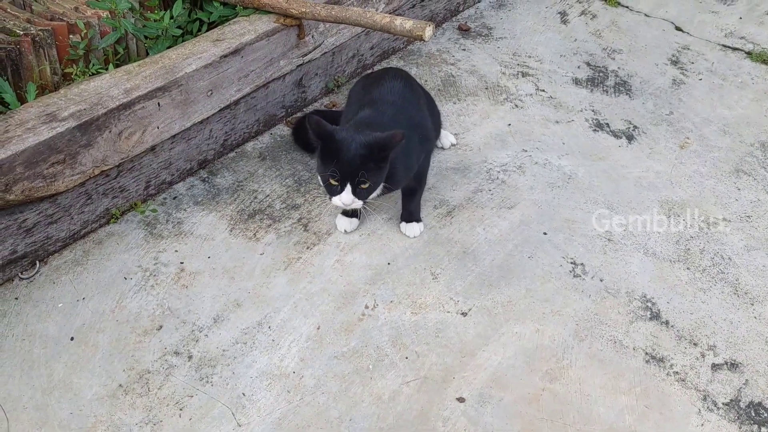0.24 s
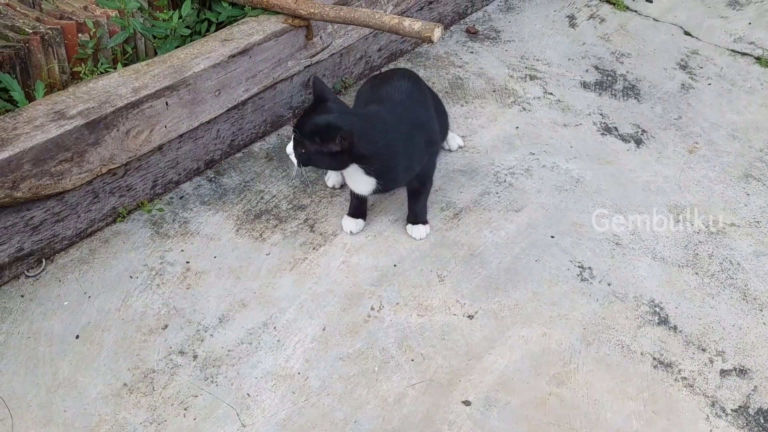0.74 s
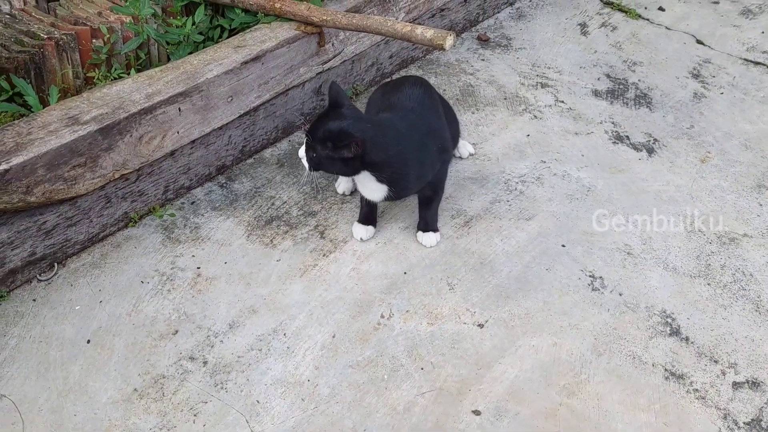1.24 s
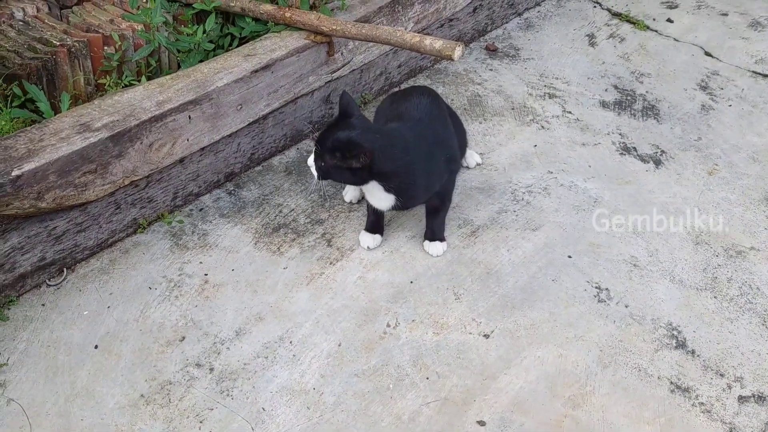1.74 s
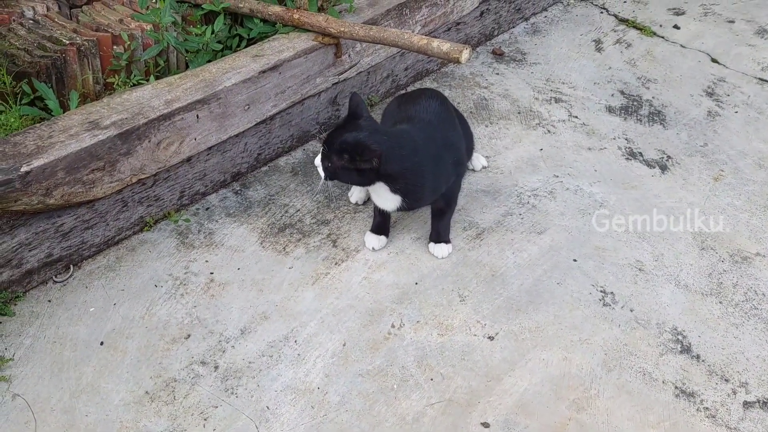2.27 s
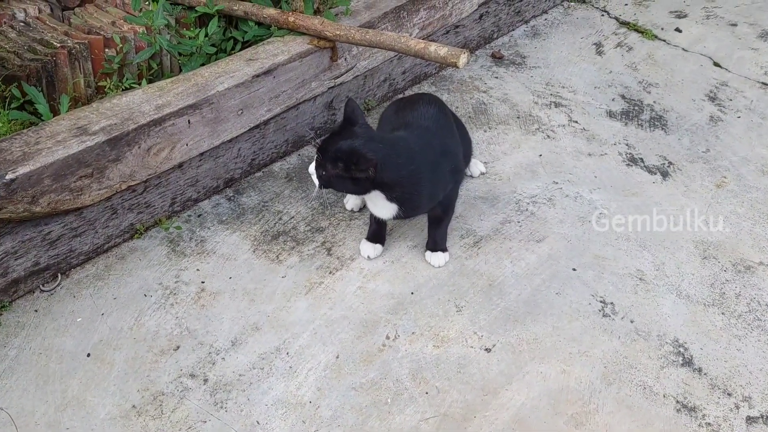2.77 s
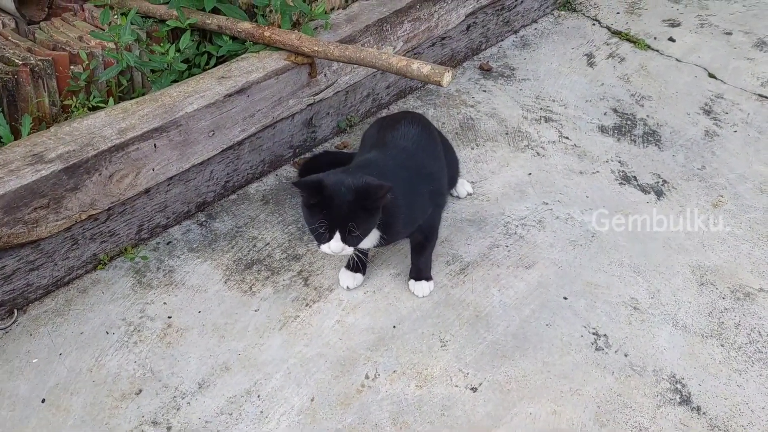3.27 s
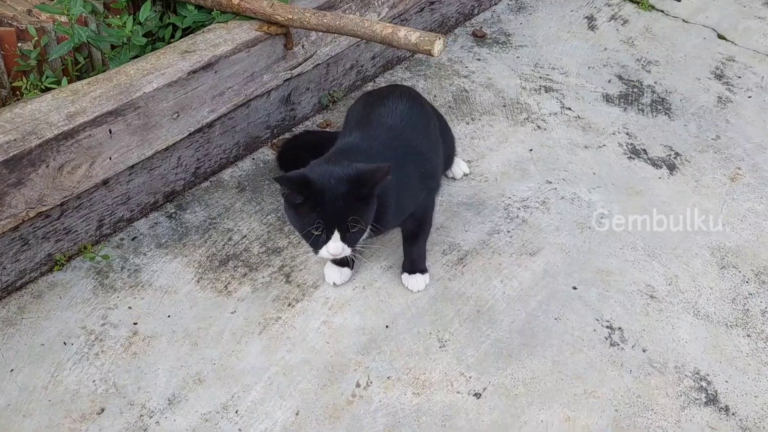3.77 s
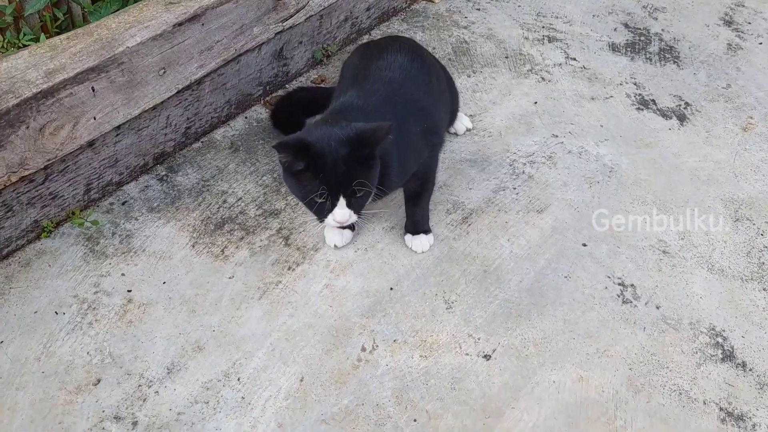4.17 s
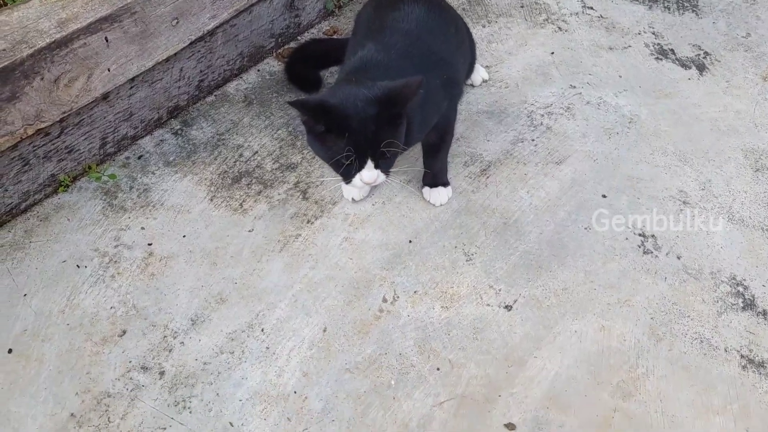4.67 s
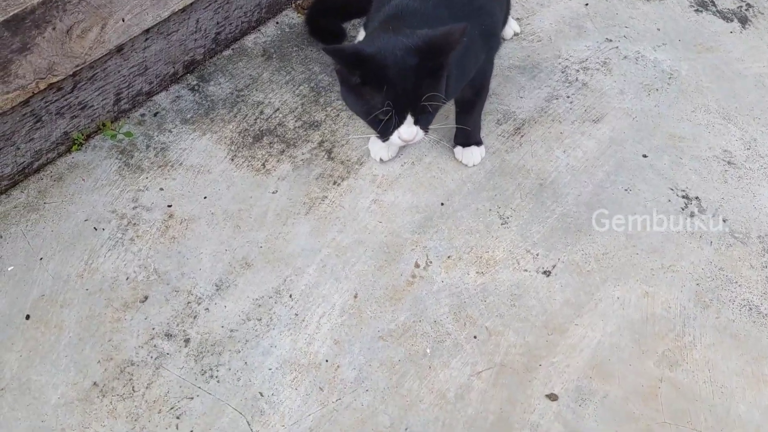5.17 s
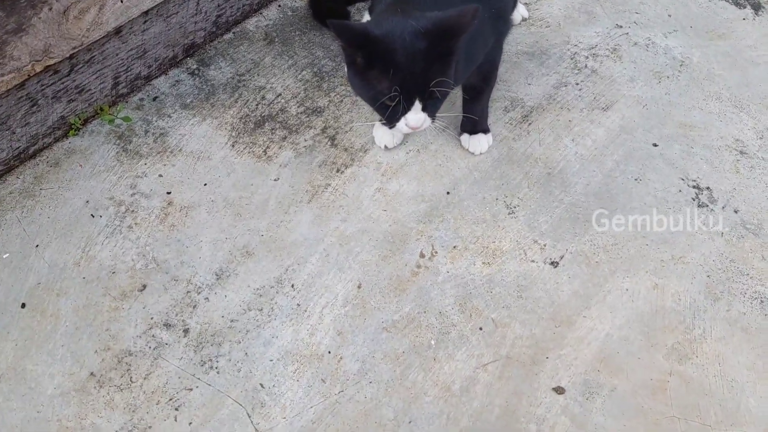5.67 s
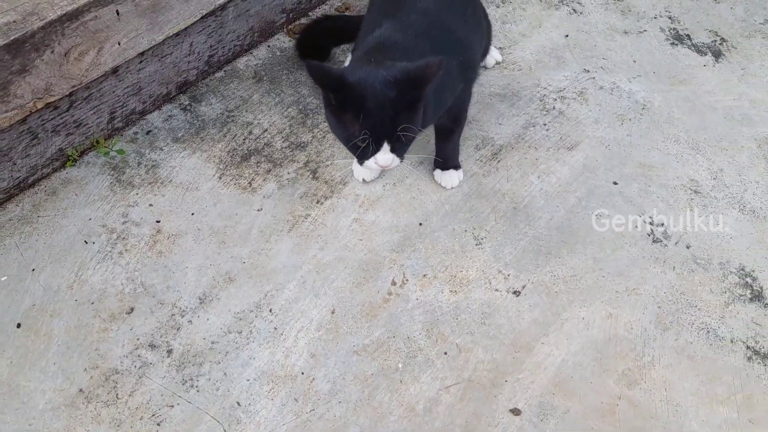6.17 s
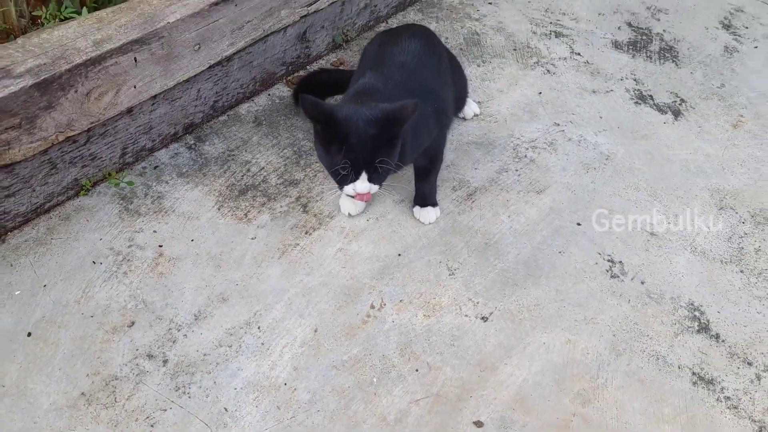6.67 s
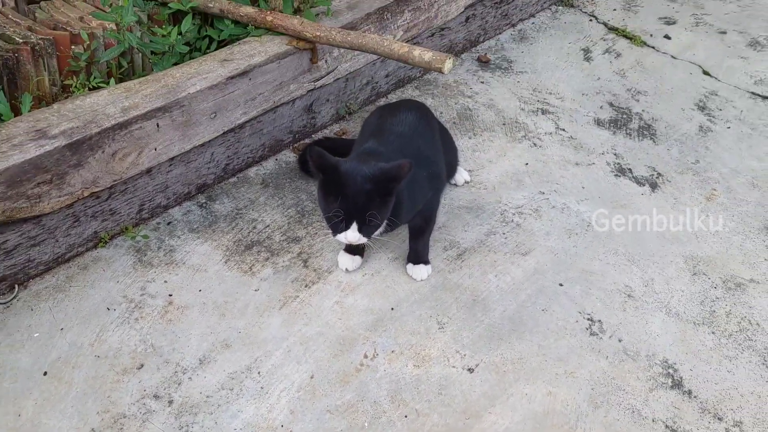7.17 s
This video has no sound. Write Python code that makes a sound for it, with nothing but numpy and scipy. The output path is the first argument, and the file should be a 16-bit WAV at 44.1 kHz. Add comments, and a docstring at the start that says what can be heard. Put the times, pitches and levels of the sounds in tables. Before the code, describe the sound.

Outdoors in a paved yard with faint traffic rumble and thin insect hiss, a cat gives a brief low growl. A songbird whistles a quick repeating phrase on the left. The growl returns, climbs and opens into one long, loud, nasal yowl that falls away. A rival's softer moan overlaps its end and sinks into a creaky growl, with a few bird notes. Close cat, light open-air echo.

```python
"""In a paved yard with insects and far traffic in the air, a songbird repeats its phrase from the trees. A tomcat
growls low, then opens its mouth into one long yowl; a rival answers with a falling moan and a creaky growl.
The cat is a stack of overtones shaped by nose, mouth and throat; the rival is uneven pulses ringing a throat.
Birds are near-sine whistles on drawn tracks; insects, hiss, breath and traffic are shaped noise.
Decaying noise echoes the animals off walls and trees."""
import sys
import numpy as np
from scipy import signal
from scipy.io import wavfile
from scipy.ndimage import uniform_filter1d

SR = 44100
rng = np.random.default_rng(int(sys.argv[2]) if len(sys.argv) > 2 else 0)


def master(y):
    """Save y as 16-bit WAV."""
    cut = np.clip(np.atleast_2d(y).T, -1, 1)
    pcm = np.round(cut * 32767)  # scale
    wavfile.write(sys.argv[1], SR, pcm.astype(np.int16))


N = 327663
T = np.arange(N) / SR
CONTROL_STEP = 64   # samples between the slow control points of the tomcat

# Colour of the open air and far traffic: (frequency [Hz], relative density [dB per Hz])
AIR_COLOUR = [(15, -47), (25, -27), (43, -6.5), (91, -4.5), (125, -7.5), (147, -14), (227, -15.5),
              (410, -28), (701, -35), (2690, -44), (3250, -39), (5130, -63.5), (5870, -39.5),
              (10300, -42.5), (15400, -54)]
AIR_DB = -54
# Swell of the far traffic: (time [s], level change [dB])
TRAFFIC_SWELL = [(0, 4), (1, 0), (2, 3), (4, 6.5), (5, 4.5), (6.6, -4.5), (7.1, 0), (7.43, 2.5)]
# How alike left and right are in the noise beds: (frequency [Hz], likeness [0 to 1])
STEREO_LIKENESS = [(50, 0.94), (150, 0.78), (500, 0.37), (2000, 0.27), (8000, 0.0091)]
# Treble hiss: (time [s], level [dB])
HISS_LEVEL = [(0, -70), (.85, -78), (1.5, -75), (3, -73), (4, -64.5), (5.3, -64.5), (6.0, -69), (6.45, -90),
              (7.43, -82)]
# Colour of the treble hiss: (frequency [Hz], relative density [dB per Hz])
HISS_COLOUR = [(5000, -37), (7500, -12.5), (9500, -3), (12000, 3.5), (15500, 0.5)]
# Short swells of the hiss: (centre time [s], half length [s], added level [dB])
HISS_SWELLS = [(1.487, .04, 4), (2.077, 0.18, 8.5), (4.74, .04, 2), (6.58, 0.072, 8), (7.153, 0.16, 19)]
# Soft broad puffs: (centre time [s], half length [s], frequency [Hz], width [Hz], level [dB])
SOFT_PUFFS = [(3.23, 0.044, 3850, 3180, -61), (7.158, 0.2, 3910, 2530, -62)]
# Steady insect choruses: (frequency [Hz], width [Hz], level [dB])
INSECT_CHORUSES = [(6006, 270, -72.5), (10200, 1300, -74)]
# A cricket that comes and goes: (time [s], level [dB])
CRICKET_LEVEL = [(0, -72), (.78, -70), (.86, -123), (3, -88.5), (6.2, -79.5), (7.43, -78)]

# Shapes of the clear bird notes: (time from onset [s], pitch [Hz], level [dB])
ARCH_NOTE = [(-.006, 2830, -81), (-.003, 2900, -58), (.005, 3065, -46), (.037, 3200, -45),
             (.043, 3464, -41), (.047, 3500, -66), (.051, 3350, -42.5), (.071, 3226, -44.5),
             (.075, 2960, -49), (.077, 2783, -41), (.085, 2825, -57.5), (.091, 2810, -52),
             (.095, 2830, -73)]
CLIMB_NOTE = [(-.004, 1970, -54), (0, 2064, -67), (.008, 2160, -42.5), (.017, 2620, -39),
              (.023, 2738, -48.5), (.035, 2410, -42), (.038, 2260, -101), (.044, 2587, -33),
              (.05, 2434, -67), (.055, 2710, -46), (.062, 2977, -37.5), (.092, 3240, -37.5),
              (.104, 3160, -46), (.107, 3068, -75)]
WARBLE_NOTE = [(-.1, 2560, -69), (-.088, 2130, -54.5), (-.076, 2350, -55), (-.073, 2870, -47),
               (-.062, 2853, -52), (-.055, 2850, -80), (-.034, 3158, -80), (-.028, 3150, -48),
               (-.016, 3000, -45), (-.005, 2800, -62), (.002, 3744, -39), (.008, 4257, -56),
               (.016, 3906, -37), (.024, 3500, -40), (.032, 3600, -39.5), (.046, 3200, -35),
               (.06, 3400, -34), (.068, 3640, -38), (.074, 4083, -44.5), (.08, 3936, -37),
               (.086, 3500, -57), (.091, 3400, -38), (.098, 3450, -32.5), (.124, 3080, -33),
               (.138, 3330, -39), (.148, 3090, -38), (.166, 3100, -32), (.185, 2838, -38),
               (.188, 2774, -52)]
FALL_NOTE = [(0, 2754, -63), (.009, 2695, -38), (.027, 2480, -44), (.035, 2394, -64)]
# Shape of the harsh bird note: (time from onset [s], pitch [Hz], relative level [dB])
BURR_NOTE = [(0, 3080, 6.5), (.006, 3500, 2), (.014, 3844, 3), (.025, 3864, 8.5), (.04, 3900, -3),
             (.055, 3730, -43)]
# When each note is sung: (onset [s], added level [dB], pitch factor [ratio], time stretch [ratio])
ARCHES_SUNG = [(1.132, 3, 1.016, 0.93), (1.525, 6.5, 1.01, 1.08), (1.934, 4.5, 0.986, 1.1),
               (2.353, 4, 1.018, 1.04)]
CLIMBS_SUNG = [(1.286, 0.22, .99, 0.92), (1.687, 0.53, 1, 0.92), (2.102, 0.91, .99, 0.89),
               (2.523, -1.6, 1, 0.93)]
WARBLES_SUNG = [(0.361, -1, 1, 0.99), (6.86, -10.5, 1.08, 0.9)]
FALLS_SUNG = [(.551, 0.5, 1.001, 1.01), (7.043, -1, 1.01, .85)]
BURRS_SUNG = [(1.044, -62, 0.98, 1.08), (1.433, -51, 0.97, 0.95), (1.848, -52, 0.99, 1.06),
              (2.26, -51, 0.97, 0.94)]
# A faint far note: (time [s], pitch [Hz], level [dB])
FAR_PEEP = [(6.59, 3500, -79), (6.62, 3610, -75), (6.71, 3500, -69), (6.74, 3340, -75)]
# A second bird's hoarse note: (time [s], pitch [Hz], level [dB])
HOARSE_NOTE = [(6.82, 2635, -78.5), (6.96, 2746, -55.5), (7.21, 2790, -54), (7.27, 2743, -81),
               (7.4, 2750, -91)]
# The bird sits to the left: samples late on the right, until the yowl ends and after it
BIRD_LAG_EARLY, BIRD_LAG_LATE = 19, 8

# The rival's moan breaking into a creak: (time [s], pulse rate [per s], resonance [Hz], level [dB])
RIVAL_VOICE = [(5.62, 785, 782, -75.5), (5.66, 800, 745, -56.5), (5.75, 650, 710, -54.5),
               (5.85, 630, 651, -56.5), (5.9, 182, 700, -52.5), (6.4, 95, 724, -55.5),
               (6.9, 62.6, 745, -55.5), (7.43, 100, 721, -57)]
# The rival's low chest ring: (time [s], level [dB])
RIVAL_CHEST = [(5.75, -87), (5.85, -66), (6.2, -62), (6.5, -76.5), (6.9, -73), (7.1, -64), (7.43, -78.5)]

# Air rushing through the tomcat's mouth: (time [s], level [dB])
BREATH_LEVEL = [(1.9, -109.5), (2.2, -73.5), (3.2, -79), (3.4, -65.5), (3.65, -56), (3.8, -57.5),
                (5.9, -73), (6.1, -53.5), (6.3, -63), (6.34, -100)]
# Pitch of the vocal folds through growls and yowl: (time [s], pitch before jitter [Hz])
FOLD_PITCH = [(0, 117.6), (.13, 123.9), (.25, 120.3), (.48, 99.8), (1.78, 97.4), (2.04, 124.7),
              (2.4, 137.4), (2.76, 131.2), (2.88, 119.1), (3.12, 133.4), (3.24, 133.9), (3.4, 149.8),
              (3.5, 203), (3.6, 277.3), (3.68, 317.3), (3.76, 341.5), (3.88, 355.4), (4.13, 398.6),
              (4.28, 452.7), (4.38, 485.5), (4.44, 494.5), (4.52, 474.8), (4.72, 453.5), (4.86, 450.6),
              (5.03, 472), (5.16, 477.3), (5.42, 475.1), (5.6, 465.7), (5.82, 467.2), (5.98, 456.8),
              (6.05, 439.1), (6.18, 362.7), (6.335, 286)]
# The voice catches: (time [s], pitch dip [%])
VOICE_CATCHES = [(4.132, 1.43), (4.521, .7), (4.681, 1.3), (4.719, 3.7)]
# Closed-mouth growls: (start [s], end [s], nose level [dB], half-line level [dB])
GROWL_SPANS = [(-.05, 0.478, -47.5, -16), (1.782, 3.504, -46, -8)]
# Nose levels hold at GROWL_HZ; a higher growl is louder
GROWL_HZ, GROWL_DB_PER_HZ, GROWL_FADE_S = 134.9, .5, 0.077
HALVES_STOP_S, HALVES_FLUTTER_DB = 0.12, 2.5   # half lines end before the growl; they come and go
YOWL_START_S, YOWL_END_S, YOWL_FADE_S = 3.33, 6.335, 0.025
YOWL_SWELL_S, YOWL_NOSE_DB = .12, -32   # the yowl grows out of the growl
# Resonance of the nose: (frequency [Hz], gain [dB])
NOSE_GAIN = [(60, -0.5), (130, 20), (190, 0.5), (270, 6), (340, -2), (470, -19), (540, -36), (700, -52)]
# The mouth in the yowl: (time [s], mouth ring [Hz], mouth level [dB], throat level [dB], open level [dB])
MOUTH_TRACK = [(3.44, 1145, -101, -102, -63.5), (3.52, 879, -82, -86, -63), (3.601, 893, -44, -64, -52.5),
               (3.68, 983, -44.5, -48.5, -54.5), (3.861, 1141, -29.5, -57, -49),
               (3.981, 1152, -31, -53, -45), (4.141, 1244, -21, -44.5, -64), (4.165, 1316, -17.5, -68, -43),
               (4.24, 1356, -20, -71, -44.5), (4.28, 1364, -18, -42.5, -44.5),
               (4.339, 1528, -18.5, -35.5, -50), (4.438, 1763, -11, -39.5, -55.5),
               (4.518, 1691, -10, -26, -53), (4.72, 1646, -10.5, -26.5, -48), (4.858, 1667, -7.5, -30, -51),
               (5.161, 1671, -6.5, -25, -56), (5.401, 1424, -12.5, -33.5, -54),
               (5.6, 1412, -18.5, -32.5, -52.5), (5.82, 1491, -12, -33.5, -53.5),
               (5.92, 1378, -16.5, -39.5, -48.5), (5.979, 1450, -23.5, -42.5, -39.5),
               (6.058, 1394, -23.5, -46.5, -37.5), (6.08, 1358, -25.5, -61, -38.5),
               (6.18, 1150, -47, -54, -45.5), (6.33, 955, -79, -82, -53.5)]
MOUTH_WIDTH_HZ, THROAT_WIDTH_HZ = 164, 266
# Throat ring with the mouth at 1400 Hz; it follows the mouth by this share
THROAT_HZ, THROAT_PER_MOUTH_HZ = 2620, 0.51
# Broad colour of the open mouth below the throat ring: (frequency [Hz], gain [dB])
OPEN_LOW_GAIN = [(400, -21.5), (650, 1.5), (950, -2), (1400, -14), (2300, -34.5), (3200, -27.5)]
# Colour of the upper overtones: (frequency with the mouth wide [Hz], gain [dB])
OPEN_HIGH_GAIN = [(3000, -7), (3400, -14.5), (3700, -35.5), (3950, -34), (4300, -1.5), (5000, -2.5),
                  (5800, 9.5), (6500, -1), (7400, -51), (10000, -42.5), (11000, -25), (12500, -12),
                  (13500, -31), (15000, -19.5), (16000, -39)]
# Upper overtones against the throat ring; each swells and sinks on its own
UPPER_DB, UPPER_WANDER_DB = -32.5, 2.2
# A small mouth cavity that rings on its own: (time [s], frequency [Hz], level [dB])
CAVITY_RING = [(3.6, 3730, -120), (3.95, 4400, -66.5), (4.13, 4410, -74), (4.15, 4460, -55),
               (4.24, 4500, -59), (4.45, 4393, -58), (5, 4300, -58.5), (5.9, 5090, -62.5),
               (6.08, 4208, -55), (6.17, 3970, -59.5), (6.3, 3510, -68)]
# Overtones glint high up: (start [s], end [s], from [Hz], to [Hz], width [Hz], level [dB])
HIGH_GLINTS = [(4.33, 4.48, 11600, 11900, 600, -62), (4.8, 5.42, 12000, 12000, 3000, -68),
               (5.5, 6.1, 15100, 14300, 800, -65)]
# The yowl shifts between left and right: (time [s], left over right [dB])
YOWL_SIDE = [(3.4, 4), (3.8, -1), (4.25, -3.5), (4.45, -10), (4.7, 3), (5.0, -0.5), (5.15, -4.5),
             (5.95, 0.5), (6.1, 7.5), (6.35, 1)]


def from_db(db):
    """dB to gain."""
    return 10 ** (np.asarray(db) / 20)


def rms_one(x):
    """Scale to rms 1."""
    return x / np.sqrt(np.mean(x ** 2) + 1e-20)


def in_time(rows, t=T):
    """Columns of a table joined by straight lines in time."""
    s, *columns = np.transpose(rows)
    return [np.interp(t, s, c) for c in columns]


def at_hz(points, hz):
    """A spectrum read on a log frequency axis."""
    table_hz, values = np.transpose(points)
    return np.interp(np.log(hz), np.log(table_hz), values)


def gate(t, start_s, end_s, fade_s):
    """Attack, hold, release between two times."""
    return np.clip(np.minimum(t - start_s, end_s - t) / fade_s, 0, 1) ** 2


def bump(centre_s, half_s):
    """A smooth swell to 1 and back."""
    return np.exp(-((T - centre_s) / half_s) ** 2)


def drift(rate_hz):
    """Slow random wandering: noise through two equal low-pass stages, scaled to rms 1."""
    r = np.exp(-2 * np.pi * rate_hz / SR)
    noise = rng.standard_normal(N + SR)
    return rms_one(signal.lfilter([1], [1, -2 * r, r * r], noise)[SR:])   # the first second settles


def peak(hz, centre_hz, width_hz):
    """Gain of a resonance passed twice."""
    return 1 / (1 + ((hz ** 2 - centre_hz ** 2) / (hz * width_hz)) ** 2)


def band_between(x, low_hz, high_hz):
    """Band-pass between two edges."""
    return signal.sosfilt(signal.butter(2, [low_hz, high_hz], "band", fs=SR, output="sos"), x)


def band(x, hz, width_hz):
    """Band-pass around hz."""
    return band_between(x, hz - width_hz / 2, hz + width_hz / 2)


def noise_band(hz, width_hz):
    """Stereo noise around hz, separate in each channel, at rms 1."""
    return rms_one(band(rng.standard_normal((2, N)), hz, width_hz))


def pan(x, db, lag=0):
    """Place between the channels: db louder on the left, lag samples later on the right."""
    late = np.interp(np.arange(N) - lag, np.arange(N), x)
    return np.array([x * from_db(db / 2), late * from_db(-db / 2)])


def banded_noise(colour, patchy_db, floor_db=-np.inf):
    """Half-octave bands of stereo noise with their own level, flicker and likeness; rms 1."""
    out = 0
    edges = 22 * 2 ** np.arange(0, 9.6, .5)
    white = rng.standard_normal((2, 2, N))
    flicker = [drift(4.4), drift(18), drift(1.1)]
    for k, (low, high) in enumerate(zip(edges, edges[1:])):
        if at_hz(colour, high) <= floor_db:
            continue
        mid, side = band_between(white[k % 2], low, high)
        hz = np.sqrt(low * high)
        alike = np.clip(at_hz(STEREO_LIKENESS, hz), -1, 1)
        gain = from_db(at_hz(colour, hz) + patchy_db * flicker[k % 3])
        out = out + gain * (np.sqrt(1 + alike) * mid + np.sqrt(1 - alike) * side * [[1], [-1]])
    return rms_one(out)


def air_and_traffic():
    """Open air and far traffic: patchy, mostly low noise that swells and sinks."""
    return from_db(AIR_DB + in_time(TRAFFIC_SWELL)[0]) * banded_noise(AIR_COLOUR, patchy_db=3.15)


def treble_hiss():
    """High noise that leans right, with short swells."""
    level_db = in_time(HISS_LEVEL)[0]
    for s, half_s, db in HISS_SWELLS:
        level_db = level_db + db * bump(s, half_s)
    left_right_db = [[-1.5], [2.5]]
    return from_db(level_db + left_right_db) * banded_noise(HISS_COLOUR, patchy_db=-0.5, floor_db=-29)


def puffs():
    """Short swells of broad noise."""
    return sum(from_db(level_db) * bump(s, half_s) * noise_band(hz, width_hz)
               for s, half_s, hz, width_hz, level_db in SOFT_PUFFS)


def insects():
    """Narrow bands of hiss: a cricket that comes and goes and steady flickering choruses."""
    out = from_db(in_time(CRICKET_LEVEL)[0]) * noise_band(7300, 260)
    for hz, width_hz, level_db in INSECT_CHORUSES:
        out += from_db(level_db + 0.89 * drift(22)) * noise_band(hz, width_hz)
    return out


def whistle(rows, wobble=0):
    """A near sine along a pitch and level track."""
    # averaging rounds the corners of the track so that leaps do not click
    hz, level_db = uniform_filter1d(in_time(rows), size=60)
    inside = (T > rows[0][0]) & (T < rows[-1][0])
    phase = 2 * np.pi * np.cumsum(hz * (1 + wobble)) / SR
    return np.sqrt(2) * inside * from_db(level_db) * np.sin(phase)


def phrase(note, sung):
    """One note laid out at every time it is sung, with silence between."""
    first, last = note[0], note[-1]
    note = [(first[0] - .002, first[1], -120), *note, (last[0] + .002, last[1], -120)]
    return [(s + stretch * t, factor * hz, db + level_db)
            for s, level_db, factor, stretch in sung for t, hz, db in note]


def songbird():
    """Clear whistled notes, and harsh burrs whose pitch shakes at random under a 105 Hz throb."""
    clear = whistle(phrase(ARCH_NOTE, ARCHES_SUNG)) + whistle(phrase(CLIMB_NOTE, CLIMBS_SUNG))
    clear += whistle(phrase(WARBLE_NOTE, WARBLES_SUNG)) + whistle(phrase(FALL_NOTE, FALLS_SUNG))
    clear += whistle(FAR_PEEP, wobble=.03 * drift(90))
    throb = 1 + .5 * np.sin(2 * np.pi * 105 * T)
    return clear + throb * whistle(phrase(BURR_NOTE, BURRS_SUNG), wobble=.06 * drift(600))


def hoarse_bird():
    """A second bird's whistle, roughened by random pitch and level."""
    return whistle(HOARSE_NOTE, wobble=0.0097 * drift(165)) * from_db(3.66 * drift(75))


def rival(jitter, width_hz):
    """Uneven fold pulses ring one throat resonance: a tone while fast, a creak when slow."""
    per_s, hz, level_db = in_time(RIVAL_VOICE)
    unevenness = jitter * np.clip(200 / per_s, 0, 1) * drift(60)   # slow pulses are less regular
    cycles = np.cumsum(per_s * (1 + unevenness)) / SR
    since_pulse_s = (cycles % 1) / per_s
    ring = np.exp(-np.pi * width_hz * since_pulse_s)   # each pulse dies until the next
    voice = ring * np.sin(2 * np.pi * hz * since_pulse_s) * from_db(2.5 * drift(45))
    throat = rms_one(band(band(voice, 652, 280), 780, 390))
    chest = rms_one(band(ring * from_db(4 * drift(31)), 294, 130))
    sound = from_db(level_db) * throat + from_db(in_time(RIVAL_CHEST)[0]) * chest
    return sound * (T > RIVAL_VOICE[0][0])


def breath():
    """Noise in the mouth resonance, with a broader, brighter share in the throat."""
    mouth_hz = in_time(MOUTH_TRACK)[0]
    carrier = np.cos(2 * np.pi * np.cumsum(mouth_hz) / SR)
    in_mouth = np.sqrt(2) * carrier * drift(130)
    in_throat = from_db(-7.5) * rms_one(band(rng.standard_normal(N), 3100, 3600))
    return from_db(in_time(BREATH_LEVEL)[0]) * (in_mouth + in_throat)


def fold_phase(growl_jitter, yowl_jitter):
    """Running phase of the vocal folds, with random jitter and sudden catches in pitch."""
    pitch, = in_time(FOLD_PITCH, T[::CONTROL_STEP])
    jitter = np.where(T < MOUTH_TRACK[0][0], growl_jitter, yowl_jitter) * drift(35)
    jitter *= 1 + .8 * np.clip((T - 6.02) / 0.13, 0, 1)   # the folds lose their grip as the yowl falls
    for s, dip_percent in VOICE_CATCHES:
        jitter -= dip_percent / 100 * bump(s, 0.0053)
    return 2 * np.pi * np.cumsum(np.interp(T, T[::CONTROL_STEP], pitch) * (1 + jitter)) / SR


def mouth_gain(t, hz):
    """Gain of the open mouth on one overtone: mouth and throat rings, open colour and small cavity."""
    mouth_hz, mouth_db, throat_db, open_db = in_time(MOUTH_TRACK, t)
    throat_hz = THROAT_HZ + THROAT_PER_MOUTH_HZ * (mouth_hz - 1400)
    cavity_hz, cavity_db = in_time(CAVITY_RING, t)
    reach = np.clip(mouth_hz / 1380, .76, 1)   # a closing mouth pulls the upper resonances down
    wide_hz = hz / reach
    gain = from_db(mouth_db) * peak(hz, mouth_hz, MOUTH_WIDTH_HZ)
    gain += from_db(throat_db) * peak(hz, throat_hz, THROAT_WIDTH_HZ)
    gain /= 1 + (wide_hz / 3300) ** 24   # a side cavity swallows what lies above the throat ring
    gain += from_db(open_db + at_hz(OPEN_LOW_GAIN, hz)) * (hz < 3200)
    gain += from_db(throat_db + UPPER_DB + at_hz(OPEN_HIGH_GAIN, wide_hz)) * (wide_hz > 3000)
    return gain + from_db(cavity_db) * peak(hz, cavity_hz, 400)


def glints(t, hz):
    """Extra gain where an overtone meets a narrow high resonance."""
    return sum(from_db(db) * gate(t, a, b, .06) * peak(hz, np.interp(t, [a, b], [from_hz, to_hz]), width_hz)
               for a, b, from_hz, to_hz, width_hz, db in HIGH_GLINTS)


def tomcat(growl_jitter, yowl_jitter, breath_db, half_tilt_db, first_db):
    """Harmonics of the vocal folds, weighted by nose, mouth and throat; strong-weak cycles give half lines."""
    t = T[::CONTROL_STEP]
    pitch, = in_time(FOLD_PITCH, t)
    phase = fold_phase(growl_jitter, yowl_jitter)
    swell = np.clip((t - YOWL_START_S) / YOWL_SWELL_S, 0, 1)
    effort = gate(t, YOWL_START_S, YOWL_END_S, YOWL_FADE_S) * swell
    louder = from_db(GROWL_DB_PER_HZ * (np.minimum(pitch, 150) - GROWL_HZ))
    growl = sum(gate(t, a, b, GROWL_FADE_S) * from_db(db) for a, b, db, _ in GROWL_SPANS) * louder
    nasal = np.maximum(growl, effort * from_db(YOWL_NOSE_DB))
    halves = sum(gate(t, a, b - HALVES_STOP_S, GROWL_FADE_S) * from_db(db) for a, b, _, db in GROWL_SPANS)
    halves *= from_db(HALVES_FLUTTER_DB * drift(25)[::CONTROL_STEP])
    wander = drift(7)[::CONTROL_STEP]
    nose, mouth = 0, 0
    for k in [.5, 1.5, 2.5, 3.5, 4.5] + list(range(1, 35)):
        hz, wave = k * pitch, np.cos(k * phase)
        half = halves * from_db(half_tilt_db * (k - 1.5)) if k % 1 else 1
        if k < 6:
            nose_gain = from_db(at_hz(NOSE_GAIN, hz) + first_db * (k == 1))
            nose = nose + wave * np.interp(T, t, half * nasal * nose_gain)
        gain = mouth_gain(t, hz)
        if k > 6:
            gain *= from_db(UPPER_WANDER_DB * np.roll(wander, int(997 * k)))   # shifted for each overtone
        gain += glints(t, hz)
        mouth = mouth + wave * np.interp(T, t, half * gain * effort)
    mouth = mouth * (1 + from_db(breath_db) * drift(400))   # turbulence spreads a haze round each line
    nose = nose * from_db(.9 * drift(25))
    return np.sqrt(2) * (pan(nose, 0.31) + pan(mouth, in_time(YOWL_SIDE)[0], lag=1))


def yard(x, t60, start_s):
    """Scattered echoes of walls and trees: decaying noise, its own in each channel."""
    t = np.arange(int(SR * .8)) / SR
    tail = rng.standard_normal((2, len(t))) * from_db(-60 * t / t60) * (t > start_s)
    return signal.fftconvolve(x[None], rms_one(tail) / np.sqrt(len(t)), axes=1)[:, :N]


def scene():
    """All sources in the yard, from the background to the tomcat."""
    out = air_and_traffic() + treble_hiss() + puffs() + insects()

    bird, hoarse = songbird(), hoarse_bird()
    bird_lag = np.where(T < YOWL_END_S, BIRD_LAG_EARLY, BIRD_LAG_LATE)
    out += pan(bird, 6.56, lag=bird_lag) + pan(hoarse, 2.7)
    out += from_db(-9) * yard(bird + hoarse, t60=0.54, start_s=0.0078)

    other = rival(jitter=.1, width_hz=90)
    out += pan(other, 2.5) + from_db(-3) * yard(other, t60=.3, start_s=.006)

    cat = tomcat(growl_jitter=.018, yowl_jitter=.003, breath_db=-40, half_tilt_db=6.0, first_db=-10.5)
    cat = cat + breath()
    return out + cat + from_db(-8.5) * yard(cat.mean(axis=0), t60=0.11, start_s=.004)


def record(dry):
    """The microphone drops the deepest bass; the top is cut steeply."""
    dry = signal.sosfilt(signal.butter(2, 36, "high", fs=SR, output="sos"), dry)
    return signal.sosfilt(signal.ellip(12, .5, 75, 15490, fs=SR, output="sos"), dry)


dry = scene()
out = record(dry)
master(out)
```